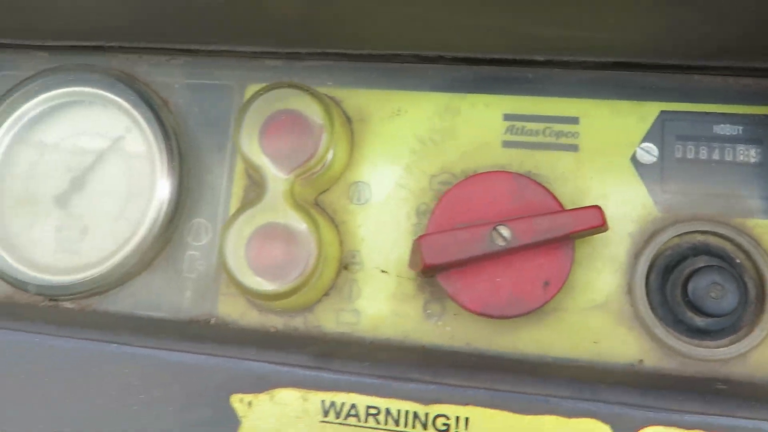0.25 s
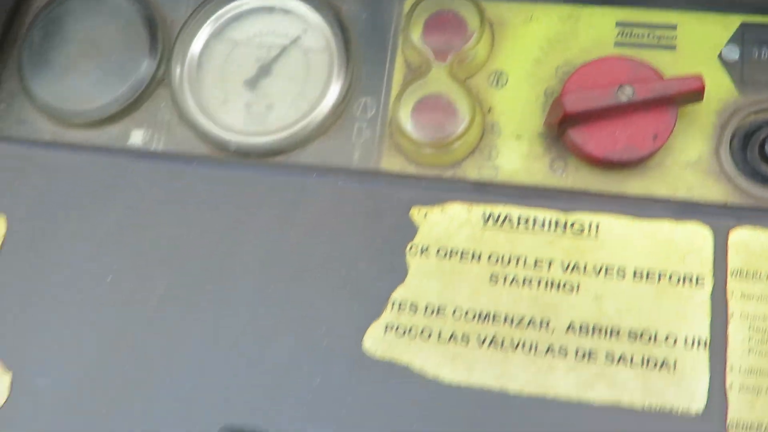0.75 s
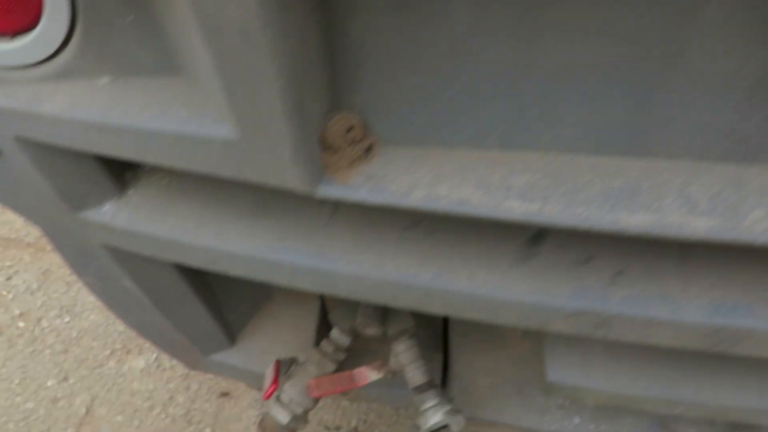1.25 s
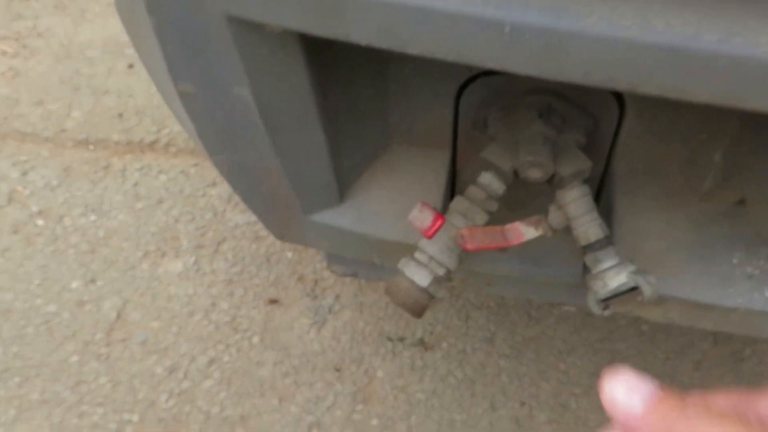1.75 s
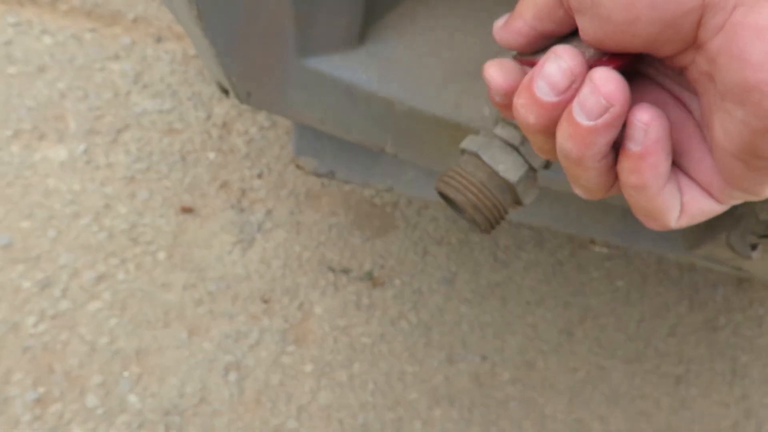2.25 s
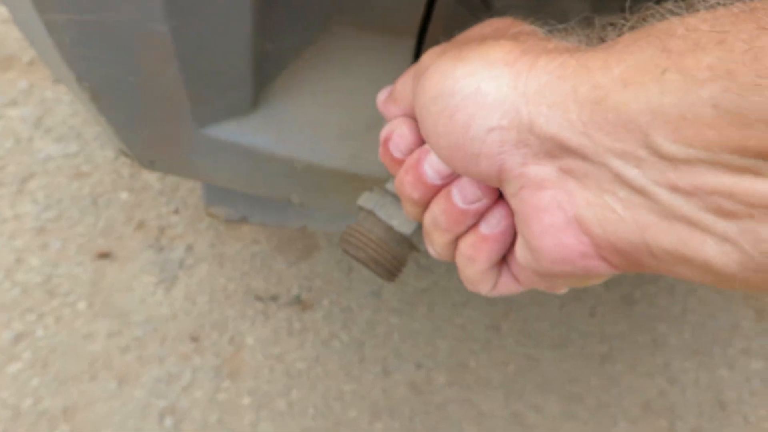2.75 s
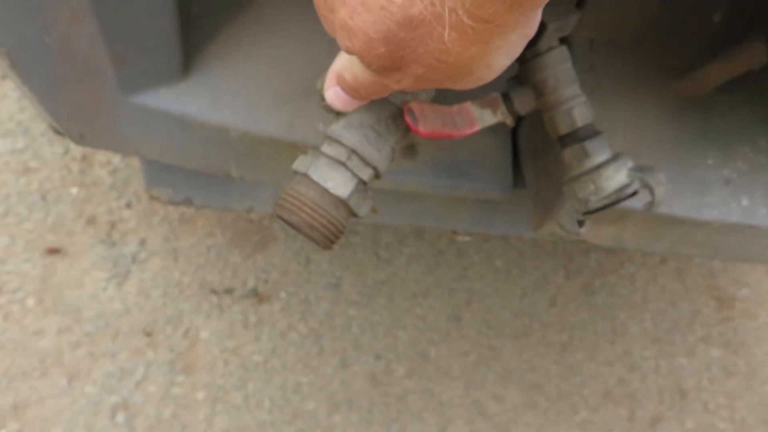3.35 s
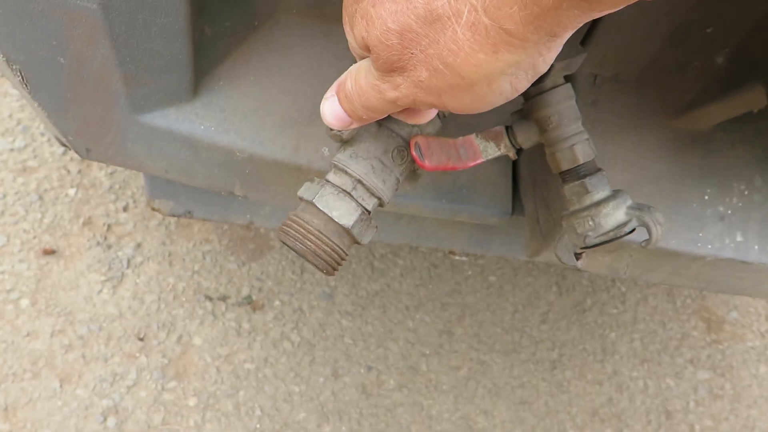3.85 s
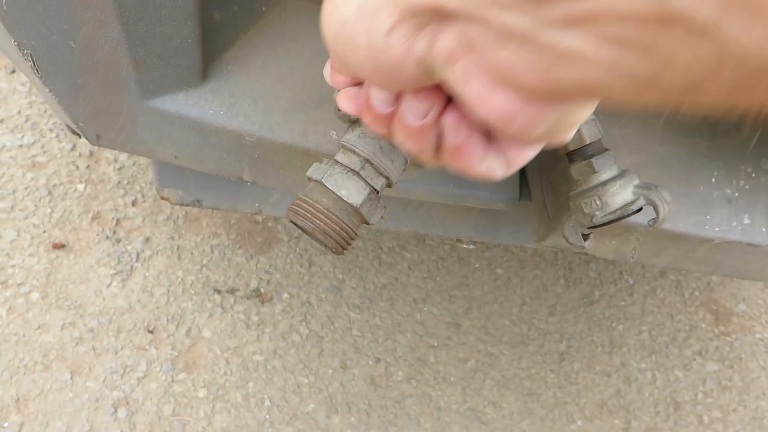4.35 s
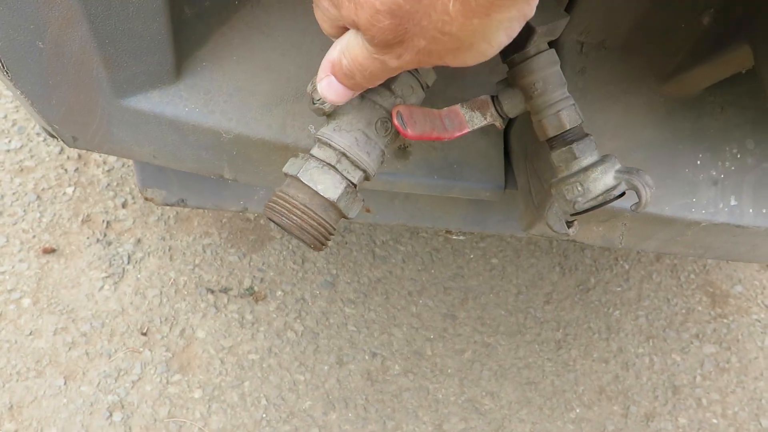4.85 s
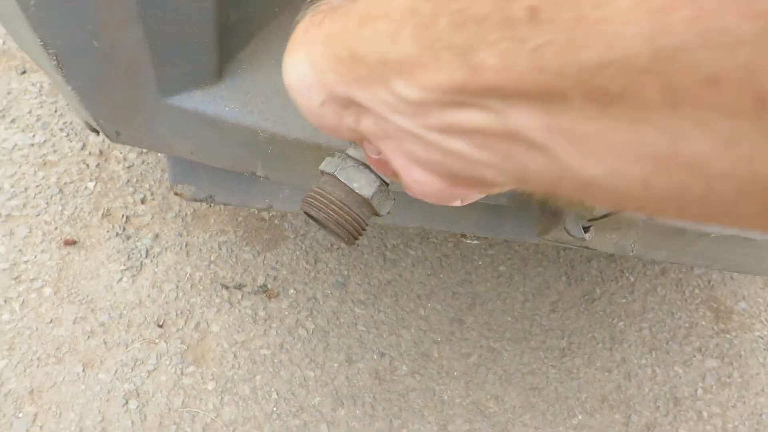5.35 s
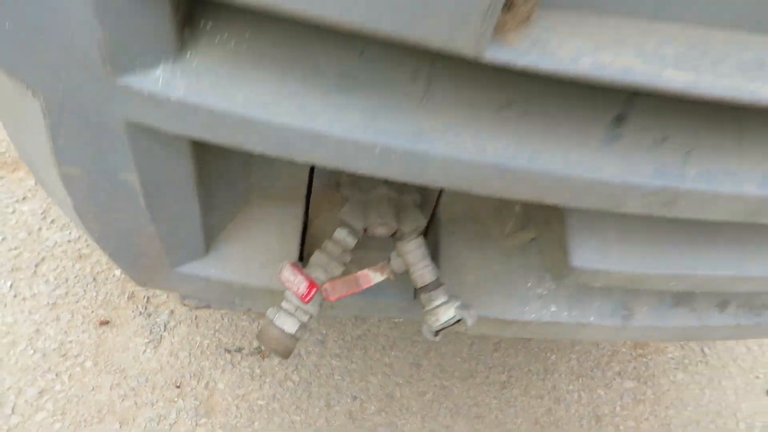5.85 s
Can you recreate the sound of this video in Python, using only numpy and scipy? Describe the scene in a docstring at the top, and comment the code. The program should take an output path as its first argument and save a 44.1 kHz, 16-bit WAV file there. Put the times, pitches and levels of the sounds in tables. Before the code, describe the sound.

A diesel engine idles steadily in an open yard, heard close up: a deep hum at about fifty pulses a second, with loping canopy thumps, metallic knocks, small rattles, gear whine and a broad rush of cooling air. A bright pulsing rasp swells around 0.6 s and fades as the microphone moves down; by 2 s the clatter is sharper and nearer. At about 3.4 s a valve opens and compressed air spits, sings and grows into a loud, wide, roaring hiss, until it closes with a brief whistle near 4.5 s. The engine returns ducked, its bass gone. At 4.9 s a second, fuller, brighter blast erupts abruptly, ending about 5.4 s with a short spit. The thin, clattering idle remains, slightly slower, creeping back, then growing quieter as the microphone pulls away toward 6 s.

```python
"""First a four-cylinder diesel on a towable air compressor idles in an open yard, heard at its control panel:
exhaust tones, canopy thumps, knocks, rattles, a passing rasp, gear whine and a rush of cooling air.
The microphone moves down to the outlet, where a hand opens a ball valve twice and compressed air roars out.
The roar is filtered noise plus a singing valve throat and a hooting pipe.
Gain control ducks the engine, and the bass stays thin from the first blast on."""
import sys
import numpy as np
from scipy import signal
from scipy.fft import rfft, irfft
from scipy.io import wavfile
from scipy.ndimage import uniform_filter1d

SR = 44100
rng = np.random.default_rng(int(sys.argv[2]) if len(sys.argv) > 2 else 0)


def int16_out(signal):
    """Quantize to a 16-bit WAV file."""
    q = np.round(np.clip(np.atleast_2d(signal).T, -1, 1) * 32767)
    wavfile.write(sys.argv[1], SR, q.astype(np.int16))


N = 269010
TIME = np.arange(N) / SR  # seconds
BINS_HZ = np.fft.rfftfreq(N, 1 / SR)

# where the microphone is: t/s, place (0 panel, 1 grille, 2 or more outlet), engine level/dB
MIC_PATH = [(0, 0.037, -0.5), (.92, 0.059, -2), (1.33, 0.83, -3), (2.25, 1.98, 0.6), (5.5, 2.7, 0.5),
            (6.1, 0.5, -5.5)]
# cylinders in firing order: push above or below the average, relative clatter level/dB
CYLINDERS = [(0.5, -35), (0.66, -29), (-0.094, -16), (-0.29, -13)]
# exhaust tone at each place: multiple of the firing rate, relative level/dB
PANEL_ORDERS = [(1, 2), (2, -4), (3, -4.5), (4, -11), (5, -11), (6, -18), (7, -58), (8, -10.5), (9, -23),
                (10, -12.5)]
OUTLET_ORDERS = [(1, 3), (2, -12), (3, -16), (4, -23), (5, -6.5), (6, -12), (7, -42), (8, -33), (9, -30),
                 (10, -11), (11, -15.5), (12, -35)]
GRILLE_ORDERS = [(1, 3.5), (2, -6), (3, -7), (4, -11), (5, -3), (6, -4.5), (7, -47), (8, -37), (9, -47),
                 (10, -11)]
# stereo width of the exhaust tone: f/Hz, side minus mid level/dB
HUM_WIDTH = [(50, -52), (100, -23), (150, -19), (300, -18), (600, -26)]
# canopy resonances: f/Hz, width/Hz, level/dB at the panel, at the grille, at the outlet
CANOPY = [(138, 12, -38, -41, -47), (164, 14, -36, -35, -37), (213, 20, -29.5, -29.5, -37),
          (242, 16, -36, -36, -42), (266, 30, -42, -37, -42), (300, 35, -48, -39, -47),
          (455, 40, -42, -38, -39), (510, 50, -41, -43, -41)]
# clatter of injectors and valve gear: f/Hz, relative level per Hz/dB at the panel, at the outlet
CLATTER = [(248, -15, -2), (470, 5, 1), (684, 2.5, 2.5), (770, 3, -4), (946, 3, 3), (1207, -11, -4.5),
           (1238, 2, 4.5), (1440, 0, -1), (1640, -1, -2.5), (2150, -2.5, -5.5), (2320, -15, -9),
           (2870, -3, -4.5), (3700, -8, -12.5), (7000, -32, -20.5)]
# knocks of injection and valves: place in the engine cycle (0-1), f/Hz, level/dB at the panel, at the outlet
KNOCKS = [(0.172, 1420, -25, -36), (0.223, 510, -32, -27), (0.238, 1330, -32, -26), (.435, 900, -37, -25.5),
          (0.486, 1285, -28, -25.5), (.49, 532, -27, -31), (.62, 552, -32.5, -25.5),
          (0.626, 1630, -47, -27), (0.706, 2056, -25.5, -26.5), (0.748, 513, -27.5, -32),
          (.755, 1340, -40, -24.5), (0.804, 2005, -39, -22.5), (0.862, 1620, -36, -26),
          (0.88, 512, -30, -21), (.935, 1284, -25.5, -40), (0.976, 1264, -22, -21), (0.98, 520, -43, -31)]
# rush of the cooling air: f/Hz, relative level per Hz/dB
COOLING_SPECTRUM = [(20, -11), (70, 7.5), (130, 6), (200, 16.5), (280, 0.5), (350, 3.5), (430, 3.5),
                    (520, -1.5), (850, -3), (1400, -2.5), (2500, -1), (3800, -3.5), (5500, -3), (7600, -6),
                    (10800, 0.5), (13000, -2.5), (15800, -10.5)]
# stereo width of the engine noise: f/Hz, side minus mid level/dB
ENGINE_WIDTH = [(50, -45), (120, -37), (250, -5), (500, -10), (1200, -10.5), (2100, -10), (4000, -4),
                (7000, 1), (11000, 2.5), (15000, 2)]
# singing lines of the drive: multiple of the firing rate, relative level/dB at the panel, at the outlet
GEAR_LINES = [(9.25, -46, -37), (10, -42, -37), (10.5, -44, -38), (10.75, -48, -40), (11, -47, -45),
              (12, -48, -40), (13.5, -53, -45), (15.5, -52, -45), (17, -56, -45), (19.5, -49, -48),
              (23, -43, -52), (25, -47, -36), (26, -42, -45), (27, -52, -38.5), (27.75, -46, -48),
              (30, -54, -45), (31, -44, -45), (32, -52, -45), (33, -45, -50), (37, -47, -52),
              (38.5, -44, -50), (40.25, -48, -45)]
# how far the hand opens the ball valve, part way and then fully: t/s, opening (0-1)
VALVE = [(3.424, 0), (3.455, 0.06), (3.515, 0.19), (3.57, 0.45), (3.8, 0.5), (4.05, 0.45), (4.2, 0.44),
         (4.41, 0.38), (4.455, 0.17), (4.481, 0), (4.858, 0), (4.871, 0.06), (4.878, 0.14), (4.892, 0.18),
         (4.92, 0.4), (4.95, 0.94), (5.315, 1), (5.34, 0.4), (5.361, 0.23), (5.373, 0.05), (5.4, 0.02)]
# air jet: f/Hz, relative level per Hz/dB barely open, wide open
JET_SPECTRUM = [(30, -13, -13), (150, 0.5, -0.5), (500, 3, -0.5), (1200, 2, 0), (2230, 3.5, .5),
                (3160, 1, 2), (5450, 1, 1.5), (6400, -1, 0), (7700, -0.5, 0), (9350, -2.5, 5.5),
                (10000, 1, 0.5), (13100, 2.5, 4.5), (14300, 1, -5), (15900, -8, -1)]
# valve throat and pipe: opening (0-1), throat f/Hz, relative throat level/dB, relative pipe hoot level/dB
THROAT = [(0, 4240, -0.5, -9), (.22, 4300, -3.5, -8.5), (.4, 4520, -12, -21), (.63, 4900, -11.5, -22),
          (0.999, 5070, -25, -39)]
# fixed peaks and dips of the outlet pipe and its recess: f/Hz, width/Hz, level/dB
RECESS = [(2060, 130, 3), (3880, 110, 3.5), (5040, 100, -3), (5270, 110, 2.5), (7050, 170, 2.5),
          (8020, 150, -2), (9780, 220, 2.5), (10250, 200, -3), (11700, 350, 1.5), (14000, 250, -2.5)]
# stereo width of the air: f/Hz, side minus mid level/dB
JET_WIDTH = [(60, 13), (400, 8.5), (1200, 6), (2400, 0), (4400, 0), (8100, -1), (15000, 0.5)]
# the bass drops away in steps: t/s, new corner of the low cut f/Hz
BASS_STEPS = [(3.51, 73.4), (3.72, 734)]

# firings per second at idle, and their loss per second from the first blast on
IDLE_HZ, SAG_HZ_PER_S = 50.58, .34
FIRST_FIRING_S = .0026
# the crank turns a little unevenly: how far it strays (firings), smoothed over this time
STRAY_FIRINGS, STRAY_S = .002, .06
# load: time to come on, harder knock, deeper exhaust at the firing rate, change per octave above it
LOAD_S, LOAD_KNOCK_DB, LOAD_HUM_DB, LOAD_TILT_DB = .5, 1, 0.5, -2.5
# the pipe delays the higher orders and smears each pulse (turns); canopy kicks are dull above KICK_HZ
PIPE_SMEAR, KICK_HZ = 0.0158, 553
# time for a knock to peak; how its timing and strength vary from cycle to cycle
KNOCK_S, KNOCK_JITTER_S, KNOCK_SPREAD_DB = .0014, .00012, 2.2
# loose fittings: ticks per second, pitch range, level and its spread
RATTLES_PER_S, RATTLE_LOW_HZ, RATTLE_HIGH_HZ = 70, 1050, 3600
RATTLE_DB, RATTLE_SPREAD_DB = -31, 3
RASP_AT_S, RASP_HALF_S = 0.62, 0.38  # middle and half length of the rasp near the panel
# the flow levels off beyond this opening (0-1); the hiss lingers briefly in the yard
CHOKE_OPENING, LINGER_S = 0.23, 0.0091
# width of the throat's song, and how far its pitch and level wander
THROAT_WIDTH_HZ, THROAT_WANDER_HZ, THROAT_WANDER_DB = 620, 70, 1.5
# the throat's broad spit has narrowed to a whistle at this opening (0-1)
WHISTLE_WIDTH_HZ, WHISTLE_OPENING = 300, .45
# low-cut corner before the steps, and the length of one step
FULL_BASS_HZ, BASS_STEP_S = 5.4, 0.033
EDGE_HZ = 15850  # upper edge of the sound


def gain_of(db):
    """Turns decibels into an amplitude factor."""
    return 10 ** (np.asarray(db) / 20)


def evened(x):
    """Scales a sound to an rms of 1."""
    return x / np.sqrt(np.mean(x ** 2) + 1e-20)


def follow(rows):
    """Reads the columns of a time curve, sample by sample."""
    s, *columns = np.transpose(rows)
    return [np.interp(TIME, s, column) for column in columns]


def along(place, *values):
    """Blends what is heard at evenly spaced places from the panel to the outlet."""
    stations = np.linspace(0, 2, len(values))
    weights = [np.interp(place, stations, weight) for weight in np.eye(len(values))]
    return sum(weight * value for weight, value in zip(weights, values))


def response(points):
    """Draws a smooth gain curve over frequency through a few points."""
    hz, db = np.transpose(points)
    return gain_of(np.interp(np.log(BINS_HZ + 1), np.log(hz + 1), db))


def coloured(x, points):
    """Filters a sound with a gain curve and scales it to an rms of 1."""
    return evened(irfft(rfft(x) * response(points), N))


def resonate(x, hz, width_hz):
    """Rings at a fixed or moving pitch: shift that pitch to zero, smooth, shift back."""
    turn = np.exp(2j * np.pi * np.cumsum(hz * np.ones(N)) / SR)
    r = np.exp(-np.pi * width_hz / SR)
    smoothed = signal.lfilter([1 - r], [1, -r], x / turn + 1e-18)
    return 2 * (turn * smoothed).real


def ports(pair, width, direct):
    """Makes left and right from a pair; the direct share leads on the left, or on the right if negative."""
    mid, diffuse = rfft(pair)
    direct = np.clip(direct, -1, 1)
    side = response(width) * (1j * direct * mid + np.sqrt(1 - direct ** 2) * diffuse)
    return irfft(np.array([mid + side, mid - side]), N)


def add(mix, s, sound):
    """Mixes a short sound in at time s."""
    part = mix[:, max(round(s * SR), 0):][:, :sound.shape[1]]
    part += sound[:, :part.shape[1]]


def firing_rate():
    """Firings per second: a steady idle that sags once air is drawn."""
    return IDLE_HZ - SAG_HZ_PER_S * np.maximum(TIME - VALVE[0][0], 0)


def crank():
    """Counts firings by summing the firing rate, each slightly early or late."""
    stray = evened(uniform_filter1d(rng.standard_normal(N), size=round(STRAY_S * SR)))
    stray = uniform_filter1d(stray, size=round(SR / IDLE_HZ))
    return np.cumsum(firing_rate()) / SR - FIRST_FIRING_S * IDLE_HZ + STRAY_FIRINGS * stray


def load():
    """Load on the engine, 0-1: it comes on when air is first drawn."""
    return np.clip((TIME - VALVE[0][0]) / LOAD_S, 0, 1)


def exhaust(firings, place, panel_db, grille_db, outlet_db):
    """The firing orders add up to one smeared dip of pressure a firing, deeper under load."""
    loaded = load()
    waves = []
    for k in range(1, len(OUTLET_ORDERS) + 1):
        strength = gain_of(loaded * (LOAD_HUM_DB + LOAD_TILT_DB * np.log2(k)))
        waves.append(strength * np.cos(2 * np.pi * (k * firings - PIPE_SMEAR * (k - 1) ** 2)))

    def tone(orders, level_db):
        gains = gain_of(np.transpose(orders)[1])
        total = sum(gain * wave for gain, wave in zip(gains, waves))
        return -gain_of(level_db) * total / np.sqrt(np.sum(gains ** 2) / 2)

    panel = tone(PANEL_ORDERS, panel_db)
    grille = tone(GRILLE_ORDERS, grille_db)
    outlet = tone(OUTLET_ORDERS, outlet_db)
    return along(place, panel, grille, outlet)


def thump(firings, place, lead, side_db):
    """Unequal cylinders kick the canopy just ahead of the exhaust pulse: the beat lopes every four firings."""
    unsteady = .07  # random share of each kick
    at = np.flatnonzero(np.diff(np.floor(firings + lead)))
    cylinder = np.round(firings[at] + lead).astype(int) % len(CYLINDERS)
    push = np.transpose(CYLINDERS)[0][cylinder]
    kicks = np.zeros((2, N))
    kicks[:, at] = -push + unsteady * rng.standard_normal((len(at), 2)).T
    rings = np.zeros((2, N))
    for hz, width, *levels in CANOPY:
        rings += gain_of(along(place, *levels)) * evened(resonate(kicks, hz, width))
    rings = signal.sosfilt(signal.butter(4, KICK_HZ, fs=SR, output="sos"), rings)
    # a quarter-turn phase shift spreads the second set of rings sideways
    side = gain_of(side_db) * signal.hilbert(rings[1]).imag
    return np.array([rings[0] + side, rings[0] - side])


def repeating(turns, hz):
    """A random rattle that comes back alike on every turn."""
    grain = rng.standard_normal((2, int(SR / hz) // 2))
    at = np.linspace(0, 1, grain.shape[1], endpoint=False)
    return evened(np.array([np.interp(turns, at, row, period=1) for row in grain]))


def clatter(firings, place, knock_decay, between_knocks, panel_db, outlet_db):
    """Diesel clatter is noise with bursts: partly alike on each firing, partly on each cycle, partly new."""
    each_firing, each_cycle = .3, 1.3  # shares of the repeating parts
    cylinders = len(CYLINDERS)
    strength = gain_of(np.transpose(CYLINDERS)[1])[np.floor(firings).astype(int) % cylinders]
    bursts = between_knocks + strength * np.exp(-(firings % 1) / knock_decay)
    rattle = each_firing * repeating(firings, IDLE_HZ)
    rattle = rattle + each_cycle * repeating(firings / cylinders, IDLE_HZ / cylinders)
    drive = bursts * (rattle + rng.standard_normal((2, N)))
    panel = coloured(drive, [(f, db) for f, db, _ in CLATTER])
    outlet = coloured(drive, [(f, db) for f, _, db in CLATTER])
    return along(place, gain_of(panel_db) * panel, gain_of(outlet_db) * outlet)


def ping(hz, level_db, sideways):
    """A struck part rings for a few milliseconds: the direct sound and its scattered share."""
    t = np.arange(round(10 * KNOCK_S * SR)) / SR
    ring = gain_of(level_db) * t / KNOCK_S * np.exp(1 - t / KNOCK_S + 2j * np.pi * hz * t)
    return np.array([ring.imag, sideways * ring.real])


def knock(firings, place):
    """Blows ring the block at the same crank angles in every cycle, each a bit early or late, weak or strong."""
    cycles = firings / len(CYLINDERS)
    out = np.zeros((2, N))
    for angle, hz, panel_db, outlet_db in KNOCKS:
        chance = rng.standard_normal((100, 3))  # more rows than there are cycles
        moments = np.flatnonzero(np.diff(np.floor(cycles - angle)))
        for at, (late, force, sideways) in zip(moments, chance):
            level_db = np.interp(place[at], [0, 2], [panel_db, outlet_db]) + KNOCK_SPREAD_DB * force
            add(out, at / SR + KNOCK_JITTER_S * late, ping(hz, level_db, sideways))
    return out


def rattles():
    """Loose fittings tick at random moments, each ringing at its own pitch."""
    out = np.zeros((2, N))
    count = round(RATTLES_PER_S * N / SR)
    chances = zip(rng.random((count, 2)), rng.standard_normal((count, 2)))
    for (when, pitch), (force, sideways) in chances:
        hz = RATTLE_LOW_HZ * (RATTLE_HIGH_HZ / RATTLE_LOW_HZ) ** pitch
        level_db = RATTLE_DB + RATTLE_SPREAD_DB * min(force, 2)
        add(out, when * N / SR, ping(hz, level_db, sideways))
    return out


def chatter(firings, hz, width_hz, peak_turn, level_db):
    """Noise through two equal resonances: a narrow rasp that swells once in every engine cycle."""
    swell = 1 + .6 * np.cos(2 * np.pi * (firings / len(CYLINDERS) - peak_turn))
    buzz = resonate(swell * rng.standard_normal((2, N)), hz, width_hz)
    buzz = resonate(buzz, hz, width_hz)
    return gain_of(level_db) * evened(buzz)


def panel_rasp(firings):
    """A bright band of pulsing noise swells and fades while the microphone is near the panel."""
    swell = np.exp(-((TIME - RASP_AT_S) / RASP_HALF_S) ** 2)
    return swell * chatter(firings, hz=2000, width_hz=450, peak_turn=0.76, level_db=-32.5)


def cooling(firings, place, throb, flutter, panel_db, grille_db, outlet_db):
    """Cooling air rushes through the canopy as coloured noise, throbbing with the firings."""
    gusts = evened(uniform_filter1d(rng.standard_normal(N), size=150))
    swell = 1 + throb * np.cos(2 * np.pi * firings) + flutter * gusts
    rush = coloured(swell * rng.standard_normal((2, N)), COOLING_SPECTRUM)
    return gain_of(along(place, panel_db, grille_db, outlet_db)) * rush


def gear_whine(firings, place, panel_db, outlet_db):
    """The drive sings on high multiples of the firing rate, wavering in strength."""
    waver, waver_hz = .35, 12  # depth, and new random values per second
    moments = np.arange(0, N / SR + 1, 1 / waver_hz)
    panel, outlet = np.zeros((2, N))
    for k, at_panel, at_outlet in GEAR_LINES:
        strength = 1 + waver * np.interp(TIME, moments, rng.standard_normal(len(moments)))
        line = np.sqrt(2) * strength * np.cos(2 * np.pi * (k * firings + rng.random()))
        panel = panel + gain_of(at_panel + panel_db) * line
        outlet = outlet + gain_of(at_outlet + outlet_db) * line
    return along(place, panel, outlet)


def blast(firings, flow_db, throat_width_hz, overtone, overtone_db, flutter):
    """A turbulent jet hisses; the part-open valve throat sings, and the pipe hoots with each engine cycle."""
    opening = np.clip(follow(VALVE)[0], 0, 1)
    flow = np.tanh(opening / CHOKE_OPENING) ** 2
    r = np.exp(-1 / (LINGER_S * SR))
    lingering = np.maximum(flow, signal.lfilter([1 - r], [1, -r], flow + 1e-18))

    openings, *columns = np.transpose(THROAT)
    throat_hz, throat_db, pipe_db = (np.interp(opening, openings, column) for column in columns)
    throat_hz = throat_hz + THROAT_WANDER_HZ * evened(uniform_filter1d(rng.standard_normal(N), size=1500))
    throat_db = throat_db + THROAT_WANDER_DB * evened(uniform_filter1d(rng.standard_normal(N), size=2000))
    jet, turbulence = rng.standard_normal((2, 2, N))

    def ring(hz, width_hz):
        return evened(resonate(resonate(turbulence, hz, width_hz), hz, width_hz))

    whistling = np.clip(opening / WHISTLE_OPENING, 0, 1) ** 2
    throat = (1 - whistling) * ring(throat_hz, throat_width_hz)
    throat += whistling * ring(throat_hz, WHISTLE_WIDTH_HZ)
    throat += gain_of(overtone_db) * ring(overtone * throat_hz, overtone * throat_width_hz)

    recess_db = sum(db * np.exp(-((BINS_HZ - hz) / width) ** 2) for hz, width, db in RECESS)
    jet = irfft(rfft(jet) * gain_of(recess_db), N)
    barely_open = coloured(jet, [(hz, db) for hz, db, _ in JET_SPECTRUM])
    wide_open = coloured(jet, [(hz, db) for hz, _, db in JET_SPECTRUM])
    hiss = (1 - opening) * barely_open + opening * wide_open

    pipe = chatter(firings, hz=2030, width_hz=1140, peak_turn=0.076, level_db=pipe_db)
    gusts = 1 + flutter * evened(uniform_filter1d(rng.standard_normal(N), size=300))
    air = lingering * (hiss + pipe) + flow * gain_of(throat_db) * throat
    return gain_of(flow_db) * gusts * air


def scene():
    """The engine as heard along the microphone's path, and two blasts of air."""
    firings = crank()
    place, level_db = follow(MIC_PATH)
    hum = exhaust(firings, place, panel_db=-17.5, grille_db=-16.5, outlet_db=-19.5)
    hum = ports(np.array([hum, hum]), HUM_WIDTH, direct=-1)
    noise = clatter(firings, place, knock_decay=0.065, between_knocks=1.0, panel_db=-28.0, outlet_db=-25.5)
    noise += gain_of(LOAD_KNOCK_DB * load()) * knock(firings, place)
    noise += rattles() + panel_rasp(firings)
    noise += cooling(firings, place, throb=0.027, flutter=0.084, panel_db=-21.5, grille_db=-21.0, outlet_db=-25.0)
    engine = ports(noise, ENGINE_WIDTH, direct=-0.28)
    engine += thump(firings, place, lead=0.174, side_db=-15.0)
    engine += gear_whine(firings, place, panel_db=0.0, outlet_db=-1.0)
    air = blast(firings, flow_db=3.5, throat_width_hz=THROAT_WIDTH_HZ, overtone=2.084, overtone_db=-1.5,
                flutter=0.018)
    air = ports(air, JET_WIDTH, direct=0.38)
    balance = gain_of([[-.5], [.5]])  # all but the deep hum is a little louder on the right
    return gain_of(level_db) * (hum + balance * engine) + balance * air


def gain_control(x, threshold_db, attack_s, held_share, recovery_db_per_s):
    """Loud sound is pushed down; part of the cut lets go at once, the rest creeps back."""
    power = uniform_filter1d((x ** 2).mean(0), size=880, origin=439)  # mean of the last 20 ms
    over_db = np.maximum(10 * np.log10(abs(power) + 1e-12) - threshold_db, 0)
    creep = recovery_db_per_s * TIME
    held_db = np.maximum.accumulate(held_share * over_db + creep) - creep
    r = np.exp(-1 / (attack_s * SR))
    cut_db = signal.lfilter([1 - r], [1, -r], np.maximum(over_db, held_db))
    return x / gain_of(cut_db)


def low_cut(x, steepness, side_factor):
    """A high-pass whose corner steps upward; it thins the left-right difference from higher up."""
    hz, s, (mid, side) = signal.stft([x[0] + x[1], x[0] - x[1]], SR, nperseg=2048, noverlap=1536)
    corner_hz = FULL_BASS_HZ
    for step_s, step_hz in BASS_STEPS:
        progress = np.clip((s - step_s) / BASS_STEP_S + .5, 0, 1)
        corner_hz = corner_hz + (step_hz - corner_hz) * progress

    def passed(corner):
        slope = (hz[:, None] / corner) ** steepness
        return slope / np.sqrt(np.hypot(slope ** 2, 1))

    mid = mid * passed(corner_hz)
    side = side * passed(side_factor * corner_hz) * passed(corner_hz)
    left_right = np.array([mid + side, mid - side]) / 2
    return signal.istft(left_right, SR, nperseg=2048, noverlap=1536)[1][:, :N]


def band_limit(x):
    """A steep low-pass removes the sound above its upper edge."""
    taps = signal.firwin(511, EDGE_HZ, window=("kaiser", 9), fs=SR)
    return signal.oaconvolve(x, taps[None], "same")


def record(dry):
    """Applies gain control, the low cut, soft overload and the band limit."""
    ducked = gain_control(dry, threshold_db=-12.0, attack_s=0.0085, held_share=0.73, recovery_db_per_s=11.5)
    thin = band_limit(low_cut(ducked, steepness=1.36, side_factor=8.0))
    rounded = thin / (1 + (thin / .82) ** 8) ** (1 / 8)  # peaks bend toward 0.82
    return band_limit(rounded)


dry = scene()
out = record(dry)
int16_out(out)
```